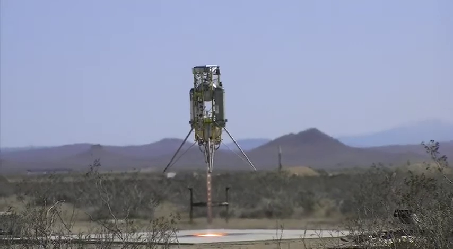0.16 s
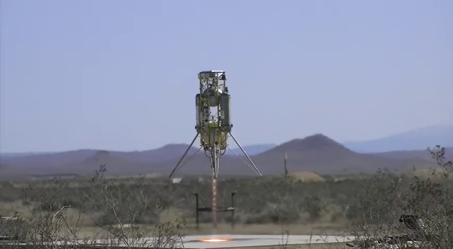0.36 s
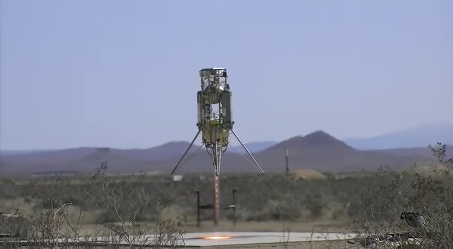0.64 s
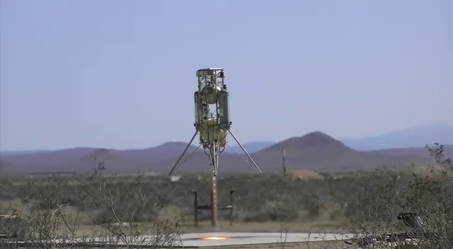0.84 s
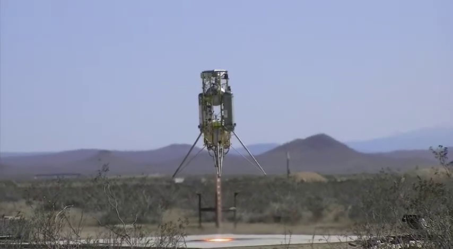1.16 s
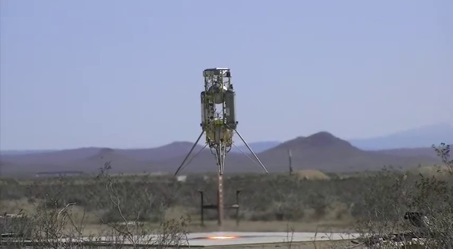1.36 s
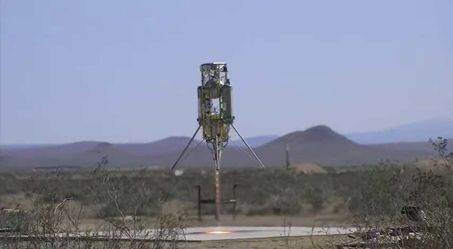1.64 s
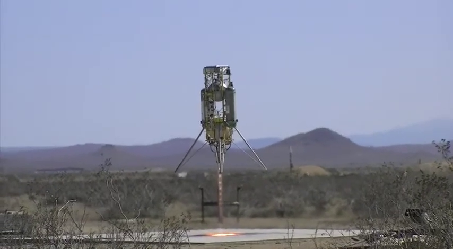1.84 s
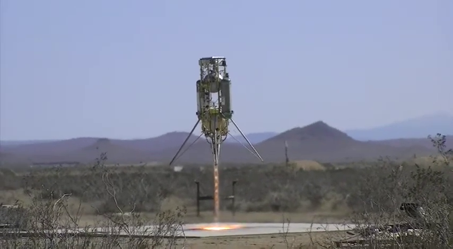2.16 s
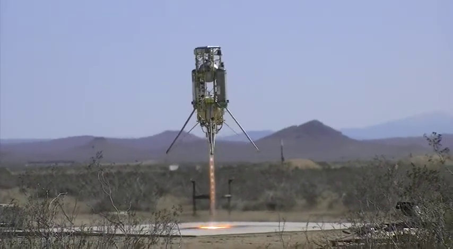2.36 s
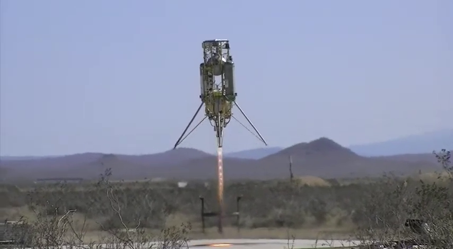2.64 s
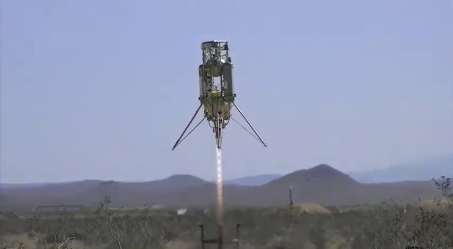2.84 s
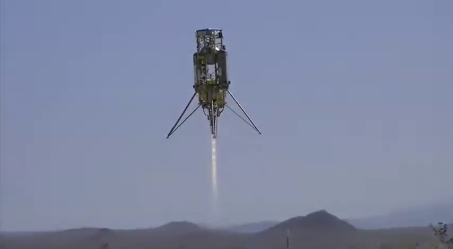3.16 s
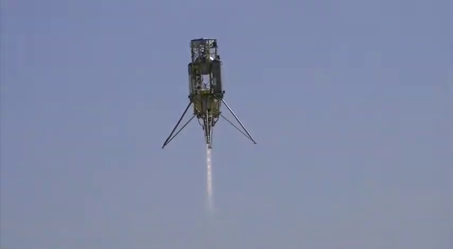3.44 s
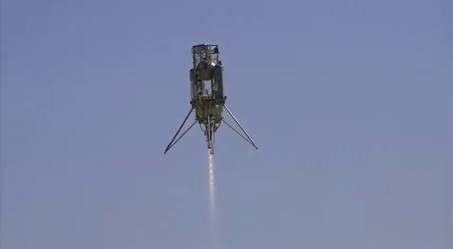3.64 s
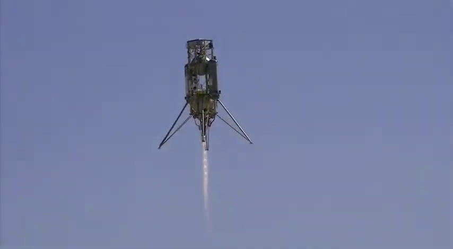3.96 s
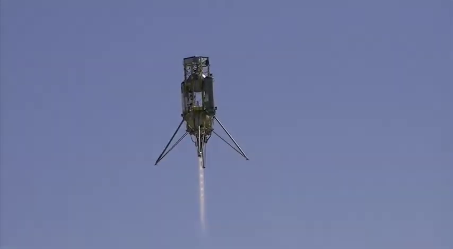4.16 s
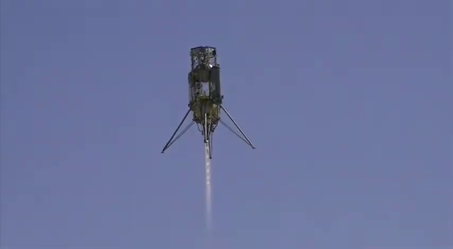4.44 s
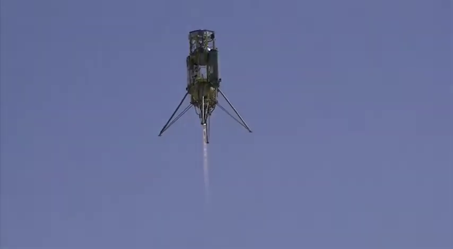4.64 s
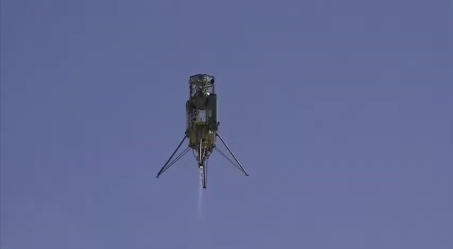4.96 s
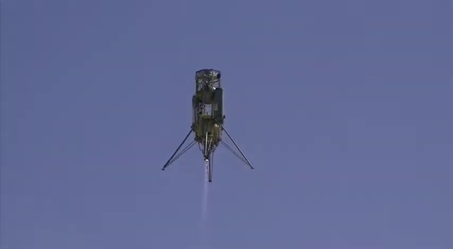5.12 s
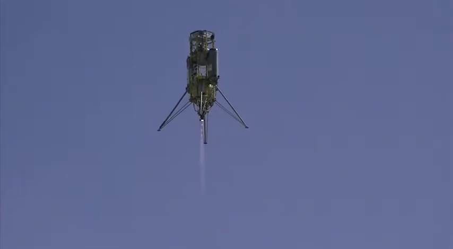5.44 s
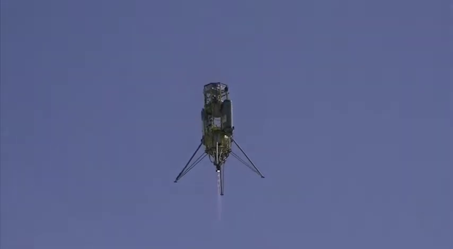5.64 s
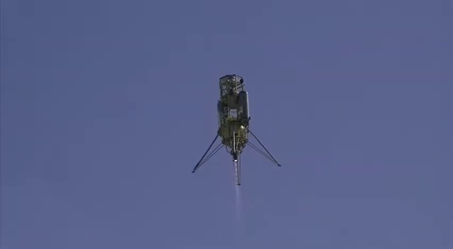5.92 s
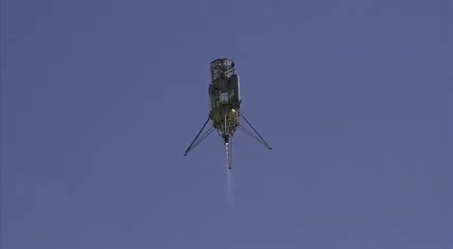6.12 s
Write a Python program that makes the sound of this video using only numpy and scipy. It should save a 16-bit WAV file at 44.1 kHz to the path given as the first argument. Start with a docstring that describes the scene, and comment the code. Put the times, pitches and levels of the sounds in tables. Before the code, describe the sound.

A small liquid-fuel rocket hovers in the open desert with a steady, fluttering hiss. As it climbs, the hiss swells into a loud roar with a breathy howl and a brief low rumble. A hollow sweep then slides down through the noise, and a low hum joins near the end. A single microphone picks it up with slight overload.

```python
"""In the open desert, a small liquid-fuel rocket hovers over its pad, then climbs away.
The turbulent plume hisses from the side and roars from below, its shock cells howl, and the exhaust
rumbles on the concrete around lift-off. The ground echo lags more and more, sweeping the tone.
Aloft, a combustion oscillation sets the engine humming, and a low rumble swells again around the hum.
The sound overloads the single microphone of a camera."""
import sys
import numpy as np
from scipy import signal
from scipy.fft import rfft, irfft
from scipy.io import wavfile
from scipy.ndimage import uniform_filter1d

SR = 44100
rng = np.random.default_rng(int(sys.argv[2]) if len(sys.argv) > 2 else 0)


def wrap_up_sound(samples):
    """Save the sound to the file named by the first command line argument, as 16-bit audio."""
    columns = np.atleast_2d(samples).T
    # keep every value between -1 and 1, then stretch to whole-number steps
    tamed = np.clip(columns, -1, 1)
    steps = np.round(tamed * 32767).astype(np.int16)
    wavfile.write(sys.argv[1], SR, steps)


N = 277389
TIME = np.arange(N) / SR


def gain_of(db):
    """Amplitude grows tenfold for every 20 dB."""
    return 10 ** (np.asarray(db) / 20)


def unit_rms(x):
    """Normalisation to a mean power of one."""
    return x / np.sqrt(np.mean(x ** 2) + 1e-20)


def curves(rows):
    """Linear interpolation in time: one curve for each column after the first."""
    seconds, *columns = np.transpose(rows)
    return [np.interp(TIME, seconds, column) for column in columns]


def ease(middle_s, ease_s):
    """A logistic step from 0 to 1, steepest at middle_s."""
    return .5 + .5 * np.tanh((TIME - middle_s) / (2 * ease_s))


def drift(rate_hz):
    """Low-pass noise: a random fluctuation with an rms of one."""
    hz = np.fft.rfftfreq(N, 1 / SR)
    return unit_rms(irfft(rfft(rng.standard_normal(N)) / np.sqrt(1 + (hz / rate_hz) ** 4), N))


def turbulence(spectrum, patchy_db, size=1024):
    """Random modulation: moving air lifts and dims patches of a coloured noise."""
    hz = np.fft.rfftfreq(size, 1 / SR)
    frames = dict(nperseg=size, noverlap=size - size // 4)
    noise = signal.stft(rng.standard_normal(N), **frames)[2]
    patches = uniform_filter1d(rng.standard_normal(noise.shape), size=40, axis=0)  # across frequency
    patches = unit_rms(uniform_filter1d(patches, size=22, axis=1))  # across time
    knot_hz, knot_db = np.transpose(spectrum)
    colour_db = np.interp(np.log(hz + 1), np.log(knot_hz), knot_db)
    shaped = noise * gain_of(colour_db[:, None] + patchy_db * patches)
    return unit_rms(signal.istft(shaped, **frames)[1][:N])


def echo(x, lag_ms, dull_hz):
    """Reflection from a rough surface: a delayed copy with its treble scattered away."""
    hz = np.fft.rfftfreq(N, 1 / SR)
    dull = irfft(rfft(x) / (1 + (hz / dull_hz) ** 2), N)
    return np.interp(TIME - lag_ms / 1000, TIME, dull)


def plume(hiss_trim_db=-0.16, roar_trim_db=0.1, flutter_db=0.55, surge_db=1.0):
    """Jet mixing noise: fine turbulence hisses and flutters; large eddies beam their roar downward."""
    # Each row: time in seconds, hiss level and roar level in dB before trim.
    levels = [(0, -13.5, -37), (.45, -14, -25), (.75, -17, -33), (1, -17, -44), (1.15, -18, -37),
              (1.7, -18.5, -33.5), (2.25, -19.5, -31.5), (2.55, -16, -29.5), (2.78, -12, -20.5),
              (3.12, -9.5, -17.5), (3.33, -11.5, -12), (3.95, -12, -15.5), (4.28, -12.5, -10),
              (4.75, -14, -5.5), (5.42, -13, -10), (5.56, -19, -8), (5.85, -21, -6), (6.29, -16.5, -8.5)]
    # Each row of either spectrum: frequency in Hz, relative spectral density in dB.
    hiss_spectrum = [(50, -31), (100, -10), (350, -10), (490, -18), (650, -8), (1200, -4), (1500, -1),
                     (2400, 0), (3700, -2), (4400, -5), (5400, -2), (8000, -5), (10500, -17), (15800, -42)]
    roar_spectrum = [(50, -63), (170, -8.5), (370, -4), (480, -4), (600, 1), (800, 2), (980, -2.5),
                     (1250, -1), (1650, -2), (2300, -6), (3200, -12.5), (6000, -18.5), (15800, -36)]
    hiss_db, roar_db = curves(levels)
    hiss_gain = gain_of(hiss_db + hiss_trim_db + flutter_db * drift(rate_hz=17))
    hiss = hiss_gain * turbulence(hiss_spectrum, patchy_db=0.86)
    roar_gain = gain_of(roar_db + roar_trim_db + surge_db * drift(rate_hz=39))
    roar = roar_gain * turbulence(roar_spectrum, patchy_db=1.23)
    return hiss + roar


def shock_howl(width_hz=640, trim_db=-2.0):
    """Shock noise: eddies crossing the shock cells radiate a band that shifts as the nozzle steers."""
    # Each row: time in seconds, centre frequency in Hz, level in dB before trim.
    band_track = [(0, 2200, -24), (.2, 2090, -18), (.5, 2197, -27), (.75, 2000, -52), (2, 1800, -36),
                  (2.35, 2114, -26.5), (2.72, 1510, -24.5), (3.07, 2572, -26), (3.22, 1841, -13),
                  (3.42, 1780, -8.5), (3.7, 1607, -13.5), (4.1, 1644, -12.5), (4.35, 1597, -29),
                  (4.7, 1558, -10), (5.1, 1706, -14.5), (6.29, 1484, -33)]
    centre_hz, level_db = curves(band_track)
    band = drift(width_hz / 2) + 1j * drift(width_hz / 2)
    carrier = np.exp(2j * np.pi * np.cumsum(centre_hz) / SR)
    return gain_of(level_db + trim_db) * (band * carrier).real


def low_rumble():
    """Jet impingement: exhaust rumbles on the concrete around lift-off, over a deeper buffeting.
    Aloft, a low rumble swells again around the engine's hum."""
    # Each row of either envelope: time in seconds, level in dB.
    rumble_levels = [(0, -38.5), (2.7, -34), (3.3, -16), (3.7, -15), (4.1, -22), (4.8, -46), (6.29, -19)]
    buffet_levels = [(0, -68), (1, -62), (1.6, -43), (2.3, -42), (2.8, -46)]
    # Each row of either spectrum: frequency in Hz, relative spectral density in dB.
    rumble_spectrum = [(50, -44), (100, -33), (180, 3), (260, 1.5), (350, 2), (480, -9.5), (900, -25),
                       (15800, -89)]
    buffet_spectrum = [(30, -34), (60, -21), (90, -6), (130, 10), (250, -22), (1000, -60), (15800, -90)]
    rumble_db, = curves(rumble_levels)
    buffet_db, = curves(buffet_levels)
    rumble = gain_of(rumble_db) * turbulence(rumble_spectrum, patchy_db=0.0)
    buffet = gain_of(buffet_db) * turbulence(buffet_spectrum, patchy_db=2.5)
    return rumble + buffet


def pad_echo(jet):
    """A changing path difference: the bounce off the pad shifts at lift-off, fades as the rocket leaves."""
    # Each row: time in seconds, lag in ms, strength from 0 to 1.
    bounce = [(0, 1.43, .16), (2, 1.22, 0.14), (2.7, 0.84, 0.36), (3.3, 0.77, 0.06), (3.75, 1.172, 0),
              (4.2, 1.2, 0.38), (4.7, 0.99, 0)]
    lag_ms, strength = curves(bounce)
    return strength * echo(jet, lag_ms, dull_hz=2340)


def nearby_echoes(sound):
    """Early reflections from around the microphone colour the sound as a steady comb filter."""
    # Each row: lag in ms, strength from 0 to 1, treble cutoff in Hz.
    surfaces = [(1.17, .27, 1000), (2.85, .2, 800)]
    return sum(strength * echo(sound, lag_ms, dull_hz) for lag_ms, strength, dull_hz in surfaces)


def ground_echo(jet, full_height_lag_ms=3.97, strength=0.52):
    """Ground interference: the reflection lags in step with the height, sweeping a comb filter down."""
    height = ease(middle_s=4.8, ease_s=0.6)  # the climb gathers speed, then eases off
    clear_of_scrub = ease(middle_s=4.3, ease_s=0.082)  # the path grows too steep for scrub to absorb
    return strength * clear_of_scrub * echo(jet, full_height_lag_ms * height, dull_hz=2900)


def chamber_hum(start_hz=305, locked_hz=279.1, trim_db=4.1, clean_db=-8, rough_per_db=.05):
    """Combustion instability: a resonance stirred by the flame sags in pitch and clears as it grows."""
    # Each row: time in seconds, level in dB before trim.
    levels = [(4.75, -44), (4.97, -24), (5.15, -30.5), (5.3, -16), (5.56, -11), (5.82, -20.5),
              (6.29, -17.5)]
    level_db, = curves(levels)
    hz = start_hz + (locked_hz - start_hz) * ease(middle_s=5.26, ease_s=0.0794)
    roughness = np.clip(rough_per_db * (clean_db - level_db), 0, 1)
    stirring = (drift(rate_hz=14) + 1j * drift(rate_hz=14)) / np.sqrt(2)
    amplitude = np.sqrt(1 - roughness ** 2) + roughness * stirring
    carrier = np.exp(2j * np.pi * np.cumsum(hz) / SR)
    tone = np.sqrt(2) * (amplitude * carrier).real
    onset_s = levels[0][0]
    fade_in = np.clip((TIME - onset_s) / 0.12, 0, 1)
    return fade_in * gain_of(level_db + trim_db) * tone


def scene():
    """Superposition: direct sound and reflections add at one microphone, which feeds both channels."""
    jet = plume() + shock_howl()
    arriving = jet + low_rumble() + pad_echo(jet) + ground_echo(jet)
    heard = arriving + nearby_echoes(arriving) + chamber_hum()
    return np.array([heard, heard])


def record(dry, ceiling=0.64, bass_shelf_hz=93, bass_cut_hz=890, edge_hz=15750):
    """Saturation and filtering: the microphone overloads, a wind filter thins the bass, the band ends."""
    saturated = ceiling * np.tanh(dry / ceiling)
    wind_filter = signal.bilinear([1, 2 * np.pi * bass_shelf_hz], [1, 2 * np.pi * bass_cut_hz], SR)
    thinned = signal.lfilter(*wind_filter, saturated)
    steep_lowpass = signal.firwin(511, edge_hz, window=("kaiser", 9), fs=SR)
    return signal.oaconvolve(thinned, steep_lowpass[None], "same", axes=1)


dry = scene()
out = record(dry)
wrap_up_sound(out)
```